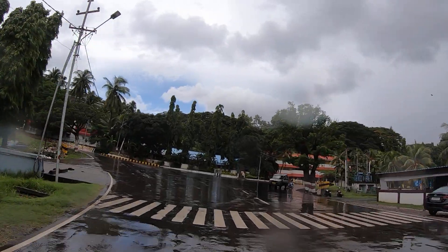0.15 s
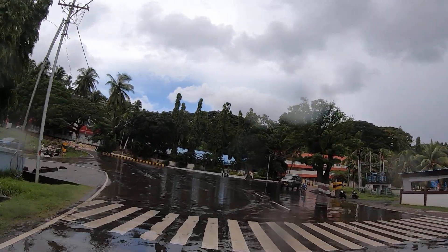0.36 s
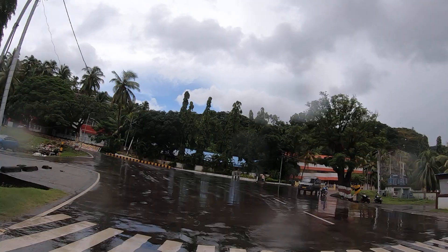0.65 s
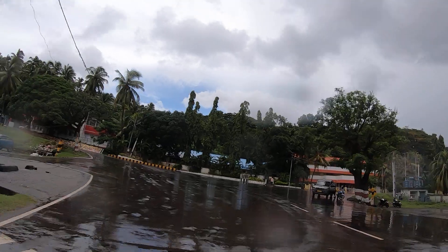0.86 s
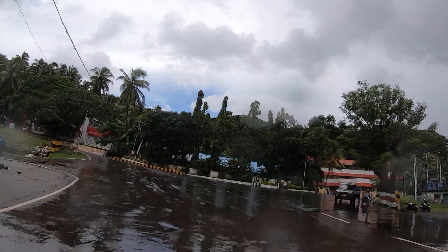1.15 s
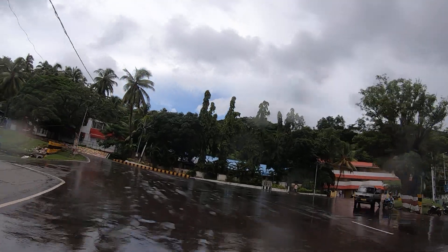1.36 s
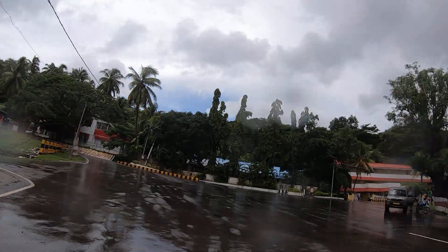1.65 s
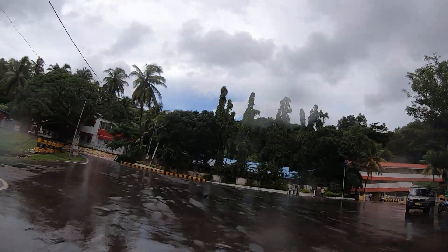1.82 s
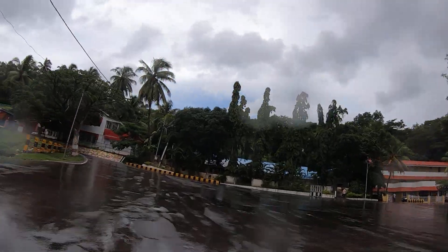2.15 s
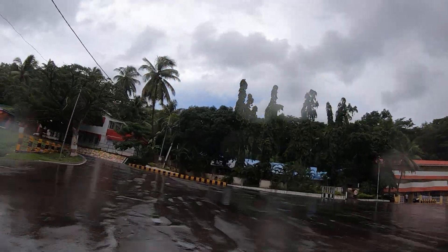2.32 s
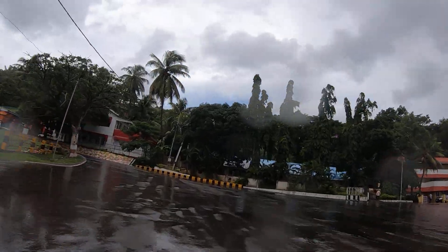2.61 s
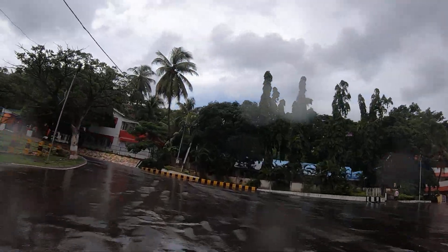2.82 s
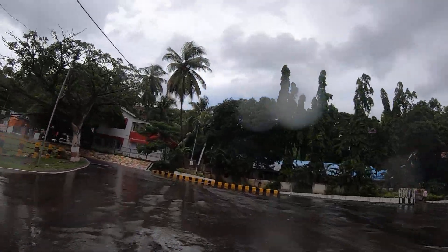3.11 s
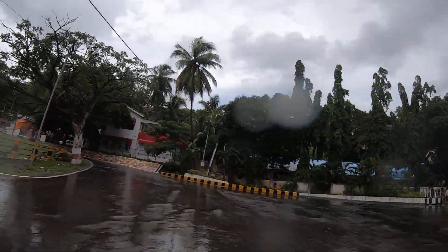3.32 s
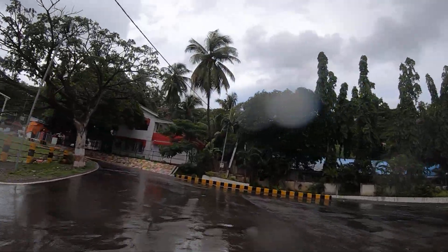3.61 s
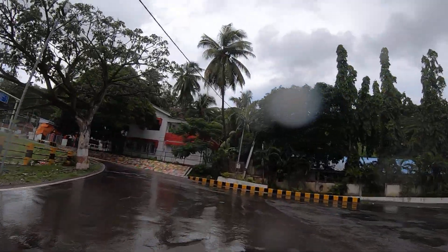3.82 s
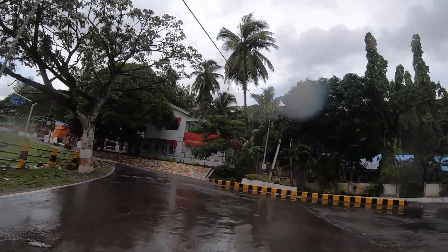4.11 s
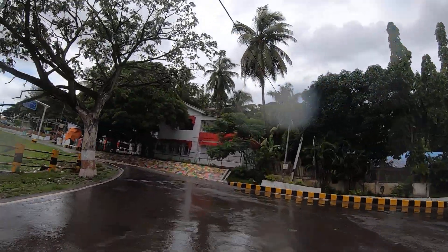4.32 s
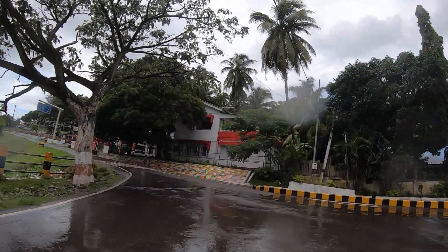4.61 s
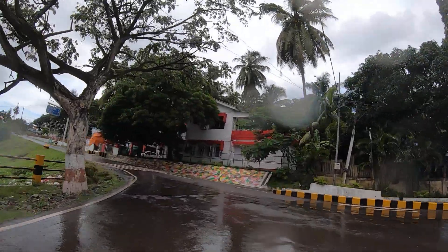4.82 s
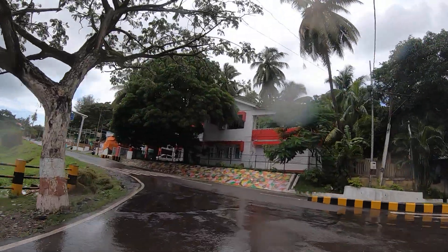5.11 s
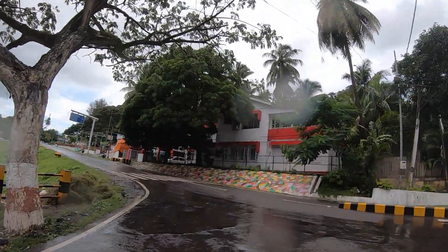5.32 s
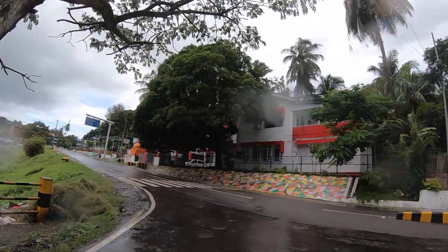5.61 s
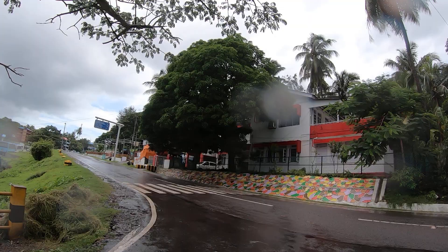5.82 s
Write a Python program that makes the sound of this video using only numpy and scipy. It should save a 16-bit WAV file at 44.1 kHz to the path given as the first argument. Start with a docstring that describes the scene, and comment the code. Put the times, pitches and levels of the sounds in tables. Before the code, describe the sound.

A single-cylinder motorcycle rounds a wet bend, heard from a microphone on the rider. At first it coasts with the throttle shut: low wind rumble and short rushing gusts cover a faint engine chatter. Tyres roar over a rougher patch from about 0.2 to 1 second and swish through puddles, throwing bright spray, until about 1.7. A thin, high metallic ring around 3 kHz, like a rubbing brake disc, comes forward near 2 seconds. A small clack falls at 1.9, and dull low thumps at 2.3 to 2.5. The engine throb gradually builds, rising slightly in pitch, and at about 3.2 the throttle opens clearly, with barking exhaust pulses, casing rattle and a fluttering gear whine. Wind and water settle lower. A sharp loose-metal clack hits at 4.4 with a brief hiss after; the metallic ring then fades. The steady throb continues, pushing harder near 5.9 with a last gust.

```python
"""A single-cylinder motorcycle rounds a wet bend, heard by a microphone on the rider.
It coasts through buffeting wind and standing water, then the throttle opens. Sine orders of the
crank make the throb and gear whine; pulses ring the exhaust; noise rings the casing and brake disc.
Coloured noise makes the wind, tyre roar and spray; clacks and low thumps are struck one by one."""
import sys
import numpy as np
from scipy import signal
from scipy.fft import rfft, irfft
from scipy.io import wavfile
from scipy.ndimage import uniform_filter1d, map_coordinates

SR = 44100
rng = np.random.default_rng(int(sys.argv[2]) if len(sys.argv) > 2 else 0)


def pcm_store(signal):
    """Save signal as 16-bit PCM."""
    levels = np.round(np.clip(np.atleast_2d(signal), -1, 1) * 32767)
    wavfile.write(sys.argv[1], SR, levels.astype(np.int16).T)


N = 262395
T = np.arange(N) / SR

# crank speed: (time [s], speed [turns/s])
CRANK = [(0, 62.5), (.7, 60.2), (1.2, 58.7), (2.1, 59.7), (2.5, 64), (3, 65.7), (3.18, 69), (3.4, 71.3),
         (3.7, 72.3), (4.3, 71.9), (5.3, 70.2), (5.95, 70.3)]


def undb(db):
    """Decibels to gain."""
    return 10 ** (np.asarray(db) / 20)


def curve(table, column=1):
    """One column of a table, joined by straight lines in time."""
    rows = np.array(table)
    return np.interp(T, rows[:, 0], rows[:, column])


def unit(x):
    """Scale to rms 1."""
    return x / np.sqrt(np.mean(x ** 2))


def noise():
    """White noise."""
    return rng.standard_normal(N)


def walk(rate_hz):
    """Random levels held for 1 / rate_hz, smoothed twice; rms 1."""
    hold = int(SR / rate_hz)
    held = np.repeat(rng.standard_normal(N // hold + 1), hold)
    smooth = uniform_filter1d(uniform_filter1d(held, hold), hold)
    return unit(smooth[:N])


def colour(x, points):
    """Shape a spectrum by (frequency [Hz], gain [dB]) points, log-spaced; rms 1."""
    hz, db = np.transpose(points)
    f = np.maximum(np.fft.rfftfreq(N, 1 / SR), 1)
    gain_db = np.interp(np.log(f), np.log(hz), db, left=-90, right=-90)
    return unit(irfft(rfft(x) * undb(gain_db), N))


def resonate(x, modes):
    """Ring (frequency [Hz], width [Hz], gain [dB]) modes, each a squared band-pass; rms 1."""
    s = 1j * np.fft.rfftfreq(N, 1 / SR)
    response = 0
    for k, (hz, width, db) in enumerate(modes):
        band = s * width / (s * s + s * width + hz * hz)
        response = response + undb(db) * band ** 2 * (-1) ** k  # alternating polarity
    return unit(irfft(rfft(x) * response, N))


def strokes(cycles, scatter_db):
    """One pulse of uneven strength at every whole cycle."""
    at = np.flatnonzero(np.diff(np.floor(cycles)) > 0)
    pulses = np.zeros(N)
    pulses[at] = undb(scatter_db * rng.standard_normal(len(at)))
    return pulses


def swells(table, attack_s, release_s):
    """Gain of (start [s], length [s], level [dB]) events that rise, hold and die away; powers add."""
    power = 0
    for start, length, db in table:
        rise = np.clip((T - start) / attack_s, 0, 1)
        fall = np.exp(-np.maximum(T - start - length, 0) / release_s)
        power = power + (undb(db) * rise * fall) ** 2
    return np.sqrt(power)


def fade(span_s, db):
    """Gain that moves from 0 dB to db over a span, linearly in dB, and stays there."""
    return undb(np.interp(T, span_s, [0, db]))


def wind():
    """Eddies rumble on the microphone and tear off in short rushes, harder in each gust."""
    # rumble and rush spectra: (frequency [Hz], gain [dB])
    rumble_colour = [(12, -14.5), (24, -7), (45, 6), (90, 1), (140, -4), (220, -25), (500, -36.5)]
    rush_colour = [(60, 3.5), (110, 1), (190, 0), (270, -4), (400, -7), (600, -19), (1000, -23.5),
                   (3000, -57), (7000, -71)]
    # gusts: (start [s], length [s], rush level [dB])
    gusts = [(.26, 0.12, -26.5), (.68, 0.25, -24), (.96, 0.19, -26.5), (1.12, 0.075, -21),
             (1.44, 0.16, -24.5), (1.7, 0.037, -40), (2.15, 0.18, -26.5), (2.32, 0.11, -23.5),
             (2.76, 0.078, -25), (2.93, 0.3, -30.5), (3.3, 0.15, -28), (3.66, 0.027, -27),
             (5.28, 0.062, -31), (5.78, 0.23, -27)]
    # lulls in the steady wind: (start [s], length [s], share dropping out [0-1])
    lulls = [(0, 0.08, 0.23), (.43, 0.08, 0.1), (1.928, 0.11, 0.37), (2.54, 0.18, 0.26)]
    rumble_db, rush_db = -24.5, -28  # steady wind
    gust_rumble_db = -10  # against the gust's rush

    lull = sum(share * np.exp(-(2 * (T - start) / length - 1) ** 2) for start, length, share in lulls)
    steady = fade((2.85, 4.75), -9) * (1 - lull)  # calmer out of the bend
    gust = swells(gusts, attack_s=0.041, release_s=0.049)
    rumble_gain = np.hypot(undb(rumble_db) * steady, undb(gust_rumble_db) * gust)
    rumble = colour(noise(), rumble_colour) * rumble_gain
    rush_gain = np.hypot(undb(rush_db) * steady, gust)
    rush = colour(noise() * undb(0.32 * walk(35)), rush_colour) * rush_gain
    return rumble + rush


def tyres():
    """Tread roars on the water film and flings droplets; puddles swell the swish, deep ones splash."""
    # roar, swish, spray and fine-drop spectra: (frequency [Hz], gain [dB])
    roar_colour = [(250, -8.5), (420, 2.5), (600, -1), (780, -1.5), (1050, -5.5), (1300, -12), (2000, -17),
                   (4000, -50)]
    tread_colour = [(600, -7), (1000, -15), (1350, -3.5), (1800, 0.5), (2300, 1.5), (2900, -2.5),
                    (3600, -7.5), (5500, -25.5)]
    spray_colour = [(1500, -7), (2700, -8), (3600, -3), (4400, -2), (5000, -9.5), (5600, -15.5),
                    (6800, -19.5), (7400, -25), (7900, -25), (8700, -31.5), (10500, -28.5), (12000, -43),
                    (14000, -44)]
    patter_colour = [(4500, -7), (6500, 5), (9000, -5), (11500, -10), (14000, -19.5)]
    # standing water: (start [s], length [s], swish level [dB])
    puddles = [(.25, 0.2, -38), (.4, 0.25, -35.5), (.66, 0.12, -35), (.98, 0.2, -36), (1.22, 0.067, -36),
               (1.42, 0.059, -38.5), (1.8, 0.083, -42.5), (2.06, 0.28, -42.5), (3.07, 0.26, -42),
               (3.4, 0.32, -47)]
    # swish on the bare water film: (time [s], level [dB])
    film = [(0, -44), (1.6, -42.5), (3.3, -44.5), (4.35, -44.5), (4.55, -46), (4.85, -46.5), (5.1, -44),
            (5.95, -47)]
    # rough stretches, first the painted crossing: (start [s], length [s], roar level [dB])
    rough = [(.16, 0.63, -35), (.26, 0.074, -30), (.7, 0.31, -33.5), (1.0, 0.34, -38.5),
             (1.52, 0.16, -38.5), (1.835, 0.015, -33), (4.0, 0.59, -39.5), (5.32, 0.037, -38),
             (5.55, 0.24, -41.5), (5.8, 0.16, -37)]
    # fine drops near the microphone: (start [s], length [s], level [dB])
    showers = [(.45, 0.21, -64), (3.1, 2.9, -70.5), (5.3, .6, -69.5), (5.58, .09, -66)]
    # brief narrow hiss: (start [s], length [s], level [dB])
    hiss_events = [(4.46, 0.35, -51.5)]
    # its band: (frequency [Hz], width [Hz], gain [dB])
    hiss_band = [(3600, 900, 0)]
    roar_db, film_spray_db = -36.5, -50
    full_splash_db, splash_growth = -34, 0.45  # swish level of a full splash; extra exponent
    splash_spray_db, splash_drops_db = -8.5, -41.5  # against the swish of a full splash
    slosh_db = -0.5  # unevenness of the standing water
    drops_per_s = 3000

    puddle = swells(puddles, attack_s=0.087, release_s=0.15) * undb(slosh_db * walk(28))
    splash = puddle * (puddle / undb(full_splash_db)) ** splash_growth

    smooth = undb(roar_db) * fade((3.4, 5.4), -5.5)  # quieter rolling out of the bend
    rolling = np.hypot(smooth, swells(rough, attack_s=0.017, release_s=0.019))
    roar = colour(noise() * undb(0.91 * walk(40)), roar_colour) * rolling

    swish_gain = np.hypot(undb(curve(film)), puddle)
    tread = colour(noise() * undb(0.19 * walk(30)), tread_colour) * swish_gain

    droplet_db = 1.6 * np.minimum(rng.exponential(size=N), 4) + .7 * walk(70)
    spray_gain = np.hypot(undb(film_spray_db), undb(splash_spray_db) * splash)
    spray = colour(noise() * undb(droplet_db), spray_colour) * spray_gain

    patter = rng.uniform(-1.1, 1, N) * (rng.random(N) < drops_per_s / SR)
    shower = np.hypot(swells(showers, attack_s=.06, release_s=.06), undb(splash_drops_db) * splash)
    fine = colour(patter, patter_colour) * shower

    hiss = resonate(noise(), hiss_band) * swells(hiss_events, attack_s=.03, release_s=0.057)
    return roar + tread + spray + fine + hiss


def engine(turns):
    """Piston throbs once a turn; each second turn a firing barks through the pipe; throttle lifts all."""
    # throttle: (time [s], opening [0-1])
    throttle_table = [(0, 0), (1.2, 0.14), (2.2, 0.22), (2.6, 0.28), (3.19, 0.37), (3.26, 0.78),
                      (3.6, 0.64), (5.75, 0.75), (5.88, 1), (5.95, 0.9)]
    # weaker engine orders: (multiple of crank speed, level against the throb [dB])
    suborders = [(.5, -11), (1.5, -26.5), (2.5, -35), (3, -27), (3.5, -30.5), (4, -29.5)]
    # exhaust and airbox resonances: (frequency [Hz], width [Hz], gain [dB])
    pipe = [(334.4, 72, 1.5), (423, 74, -4), (515, 47, -3), (650, 130, -24), (221, 50, -7.5)]
    throb_db = -16.5  # first order at full throttle
    second_db, second_rise_db = -30, 7  # throttle shut; gain when wide open
    bark_db, bark_rise_db = -42.5, 11.5  # same for the exhaust

    throttle = curve(throttle_table)
    strain = throttle ** 3
    angle = 2 * np.pi * turns
    body = np.cos(angle)
    for order, db in suborders:
        body += undb(db) * np.cos(order * angle + np.pi / 2)
    throb = body * throttle * undb(throb_db + 0.37 * walk(25))
    second = np.cos(2 * angle) * undb(second_db + second_rise_db * strain + 0.79 * walk(22))
    firing = strokes(turns / 2 - .08, scatter_db=2.5)
    intake = undb(-16.0) * strokes(turns / 2 - .77, scatter_db=6.0)
    bark = resonate(firing + intake, pipe) * undb(bark_db + bark_rise_db * strain)
    return np.sqrt(2) * (throb + second) + bark  # sqrt 2: sine peak to rms


def casing(turns):
    """The valve train chatters once a turn and rings the engine casing."""
    # rattle: (time [s], level [dB])
    rattle = [(0, -44.5), (1.0, -39.5), (1.9, -47.5), (2.2, -39), (2.6, -40.5), (3.25, -36.5),
              (3.55, -39.5), (4.3, -37.5), (4.8, -40), (5.5, -37), (5.95, -43.5)]
    # casing resonances: (frequency [Hz], width [Hz], gain [dB])
    casing_modes = [(1141, 270, 1), (1475.5, 190, 4), (1706, 91, -7), (2190, 160, -7), (3457, 210, -17.5),
                    (3720, 67, -19.5)]
    chatter = noise() * (.5 + np.exp(-(turns % 1) / 1.1))
    return resonate(chatter, casing_modes) * undb(curve(rattle))


def disc(turns):
    """Thin metal ring, likely brake disc on pads: engine-shaken rubbing rings slowly sinking modes."""
    # ring: (time [s], level [dB])
    ring = [(0, -49.5), (1.5, -47.5), (1.75, -44.5), (2.05, -43.5), (2.4, -49), (2.9, -45), (3.35, -49),
            (3.6, -45), (4.3, -44.5), (4.48, -56), (4.8, -58), (5.02, -52), (5.3, -58), (5.95, -62)]
    # disc modes halfway through, as the pitch sinks: (frequency [Hz], width [Hz], gain [dB])
    disc_modes = [(3045, 56, 6.5), (3133, 50, 3.5), (6720, 400, -25.5)]
    patchy_db, shake = .8, .5  # uneven pad touch; depth of shaking at the firing rate
    sag_per_s = 0.0035  # share by which the pitch sinks each second

    rub = noise() * (1 + shake * np.cos(np.pi * turns)) * undb(patchy_db * walk(16))
    sinking_s = T - sag_per_s * (T - T.mean()) ** 2 / 2
    sunk = map_coordinates(resonate(rub, disc_modes), [sinking_s * SR], mode="mirror")
    return sunk * undb(curve(ring))


def gears(turns):
    """Meshing teeth whine; backlash flutters each tone; a casing resonance lifts tones crossing it."""
    # whine: (time [s], gain [dB])
    whine_gain = [(0, -70), (2.5, -49), (2.97, -43.5), (3.14, -36.5), (3.35, -43.5), (3.7, -42.5),
                  (4.3, -41.5), (4.55, -43), (5.95, -42.5)]
    # octave of the whine, strongest as the throttle first opens, then dying away:
    # (time [s], gain against the whine [dB])
    octave_gain = [(3.05, -16), (3.2, -3), (3.55, -3), (3.9, -6), (4.3, -7.5), (4.5, -24)]
    # single tones singing out: (start [s], length [s], gain [dB], multiple of crank speed)
    singing_tones = [(2.67, .33, -38.5, 22.5), (3.0, .12, -42, 22), (3.16, .17, -38, 21),
                     (3.82, .38, -40.5, 20), (4.22, .13, -37, 19.8)]
    # phase flutter of the plain tones, growing rougher late on: (time [s], rms [rad])
    flutter_table = [(2.9, .35), (4.3, .5), (4.7, .95)]
    # tones near the casing resonance: multiples of crank speed
    ringing_orders = [20, 21, 22, 22.5, 24]
    octave_flutter = 2.2  # against that of the whine
    surge_depth = .55  # swell at the firing rate
    ringing_db = -53
    resonance_hz, half_width_hz = 1462, 45

    flutter_rad = curve(flutter_table)

    def tone(order, flutter=1):
        """One tooth-mesh sine, uneven in level and phase."""
        level = undb(2.0 * walk(30))
        return level * np.sin(2 * np.pi * order * turns + flutter * flutter_rad * walk(40))

    crank_hz = curve(CRANK)
    pull = np.interp(crank_hz, [69, 71.3], [0, 1])  # order 17 takes over from 16 as speed rises
    whine = (1 - 0.56 * pull) * tone(16) + (0.38 + 0.85 * pull) * tone(17)
    octave = (1 - pull) * tone(32, octave_flutter) + (.5 + pull / 2) * tone(34, octave_flutter)
    octave *= undb(curve(octave_gain))
    ringing = 0
    for order in ringing_orders:
        detune = (order * crank_hz - resonance_hz) / half_width_hz
        ringing = ringing + tone(order) / (1 + detune ** 2)
    singing = 0
    for start, length, db, order in singing_tones:
        swell = swells([(start, length, db)], attack_s=0.064, release_s=0.034)
        singing = singing + tone(order) * swell
    surge = 1 + surge_depth * np.cos(np.pi * turns)
    return surge * ((whine + octave) * undb(curve(whine_gain)) + singing) + ringing * undb(ringing_db)


def jolts():
    """Loose metal clacks as decaying noise, each with its own ring; the mount thumps as swelling sines."""
    # clacks: (time [s], gain [dB], ring [Hz])
    clacks = [(1.891, -33, 1500), (4.386, -31.5, 2200), (4.430, -24.5, 2200), (4.433, -27, 1500),
              (4.436, -28, 3400)]
    # clack spectrum: (frequency [Hz], gain [dB])
    clack_colour = [(300, -9), (700, -2), (1300, 1), (2200, 0), (3000, -6), (3900, -8), (5200, -19),
                    (8000, -33), (13000, -53)]
    # low thumps: (time [s], gain [dB], frequency [Hz])
    thumps = [(.85, -17, 33), (2.264, -15, 38.7), (2.372, -17.5, 126), (2.49, -12.5, 59.3),
              (3.682, -17, 86)]
    clack_decay_s, clack_width_hz = .003, 1200
    thump_rise_s = 0.018

    out = np.zeros(N)
    for start, db, hz in clacks:
        decay = (T >= start) * np.exp(-np.abs(T - start) / clack_decay_s)
        ring = resonate(noise(), [(hz, clack_width_hz, 0)])
        blow = undb(db) * decay * (noise() + ring / 2)
        out += colour(blow, clack_colour) * np.std(blow)  # keeps the blow's rms
    for start, db, hz in thumps:
        age_s = np.maximum(T - start, 0)
        swell = age_s / thump_rise_s
        out += undb(db) * swell * np.exp(1 - swell) * np.sin(2 * np.pi * hz * age_s)
    return out


def scene():
    """One crank, slightly unsteady, drives all the machinery; wind and water surround it."""
    turns = np.cumsum(curve(CRANK) * (1 + 0.00205 * walk(9))) / SR
    machinery = engine(turns) + casing(turns) + disc(turns) + gears(turns)
    return (wind() + tyres() + machinery + jolts())[None]


def record(dry):
    """A steep elliptic low-pass cuts the top."""
    top_hz = 14200
    low_pass = signal.ellip(8, .2, 70, top_hz, fs=SR, output="sos")  # 0.2 dB ripple, 70 dB stop
    return signal.sosfilt(low_pass, dry)


dry = scene()
out = record(dry)
pcm_store(out)
```